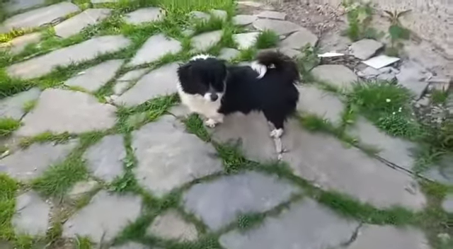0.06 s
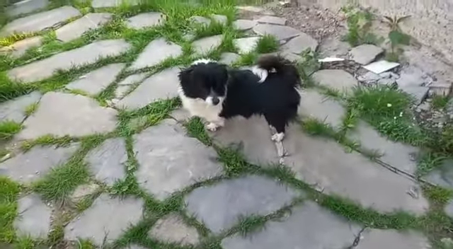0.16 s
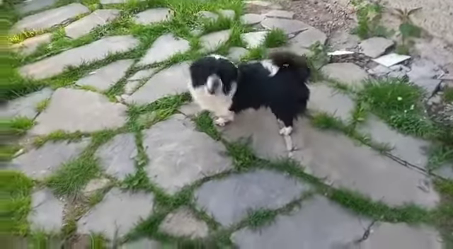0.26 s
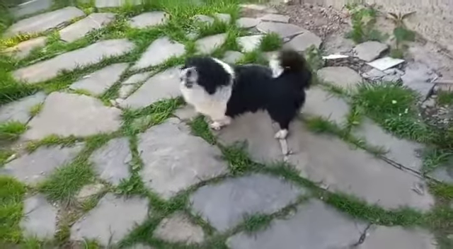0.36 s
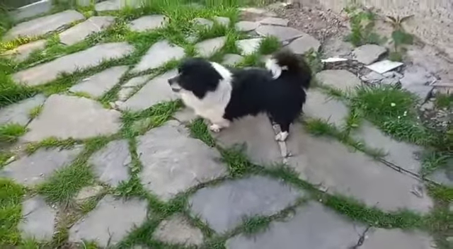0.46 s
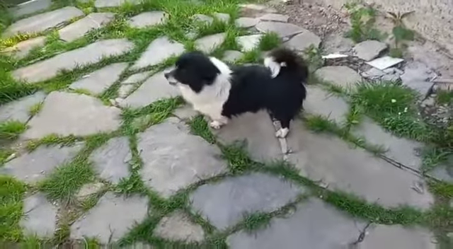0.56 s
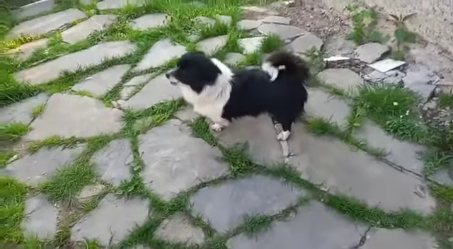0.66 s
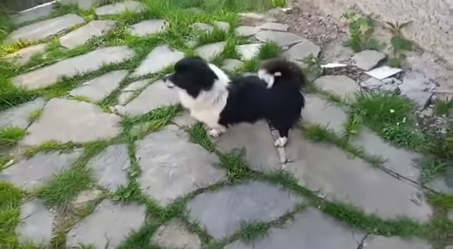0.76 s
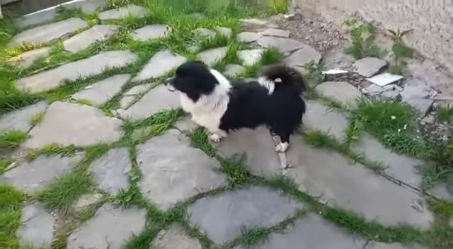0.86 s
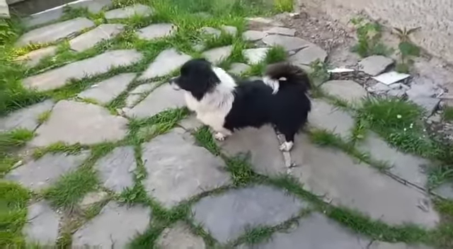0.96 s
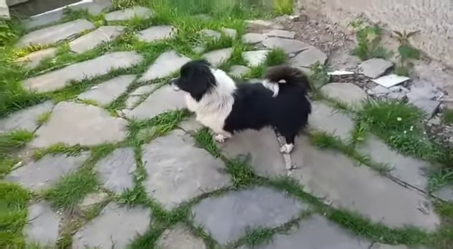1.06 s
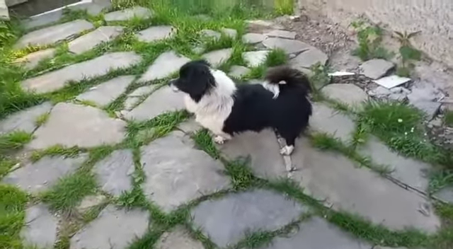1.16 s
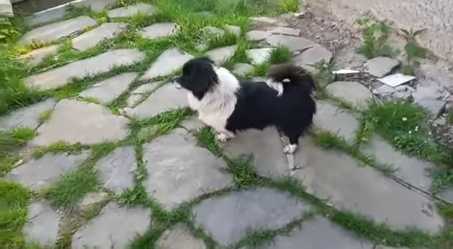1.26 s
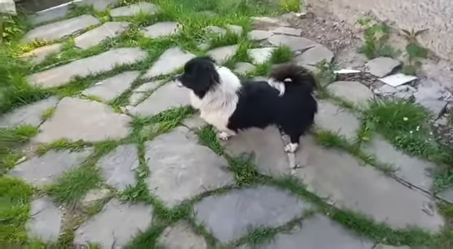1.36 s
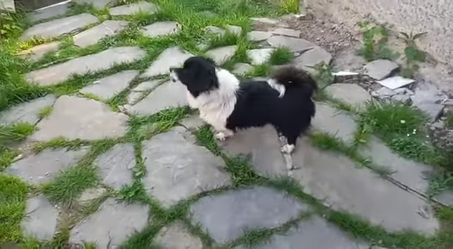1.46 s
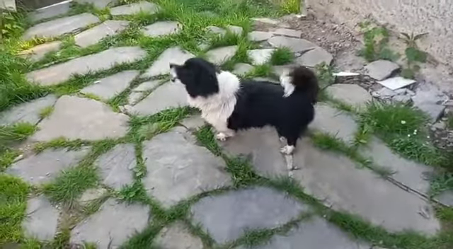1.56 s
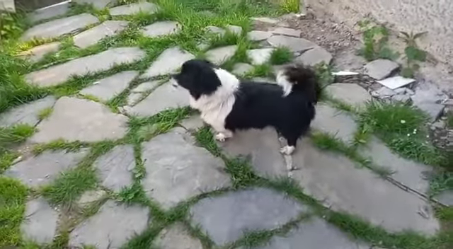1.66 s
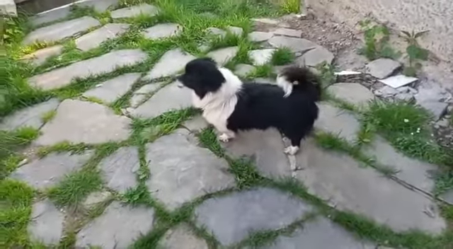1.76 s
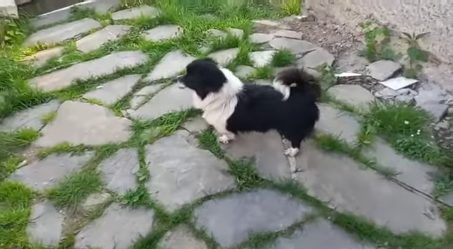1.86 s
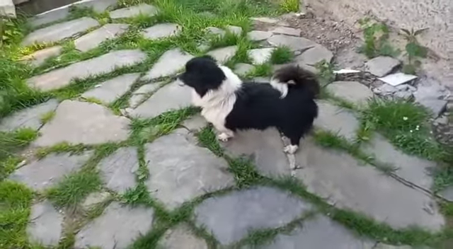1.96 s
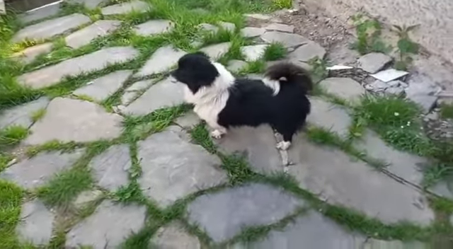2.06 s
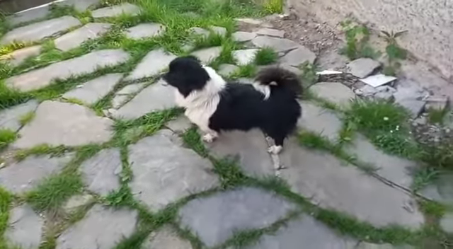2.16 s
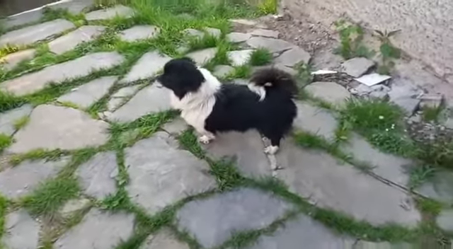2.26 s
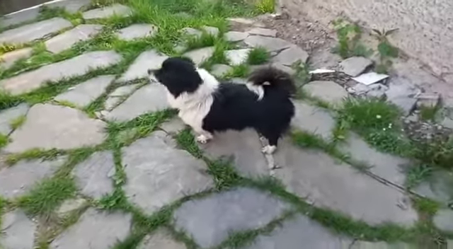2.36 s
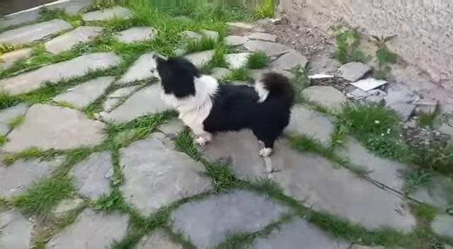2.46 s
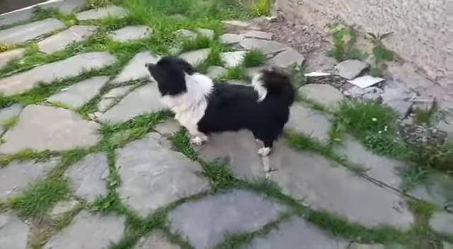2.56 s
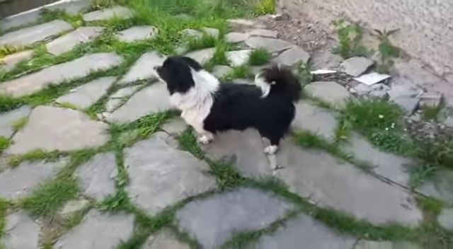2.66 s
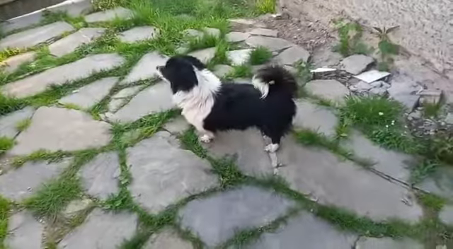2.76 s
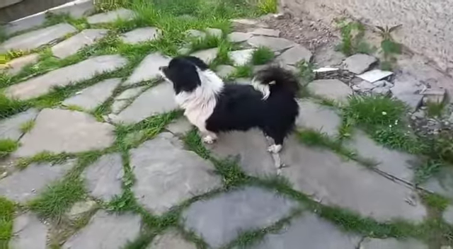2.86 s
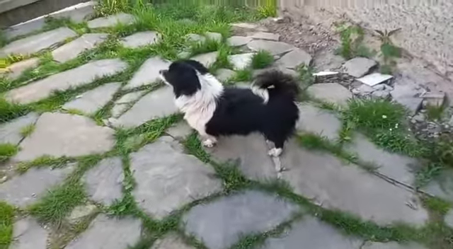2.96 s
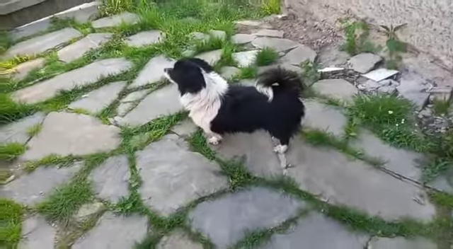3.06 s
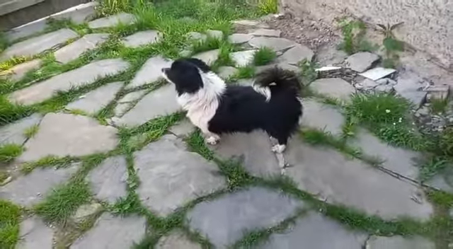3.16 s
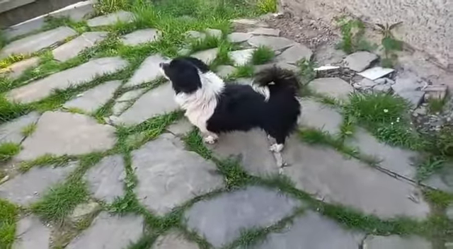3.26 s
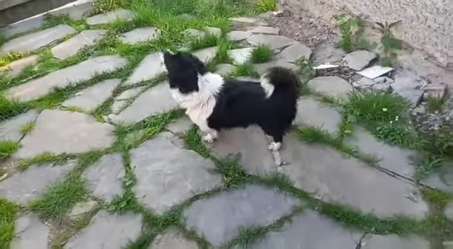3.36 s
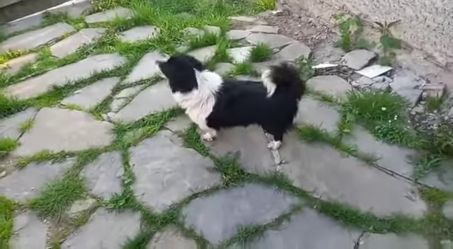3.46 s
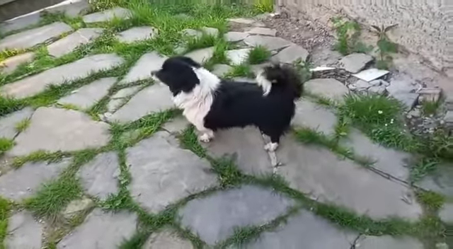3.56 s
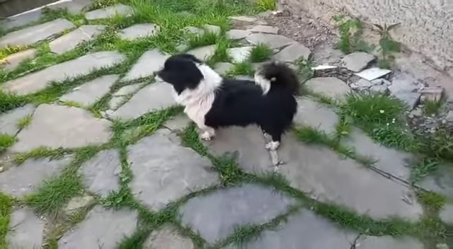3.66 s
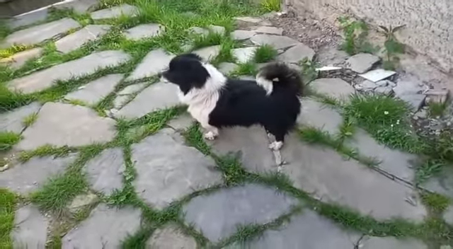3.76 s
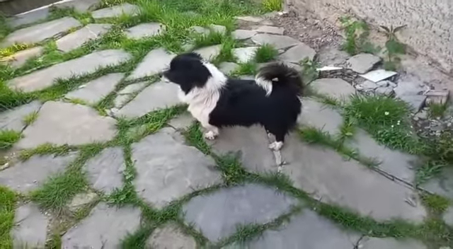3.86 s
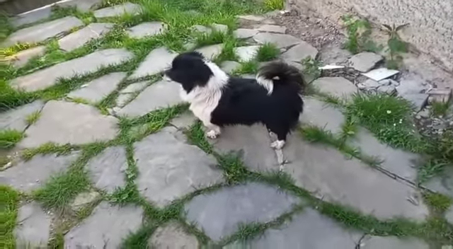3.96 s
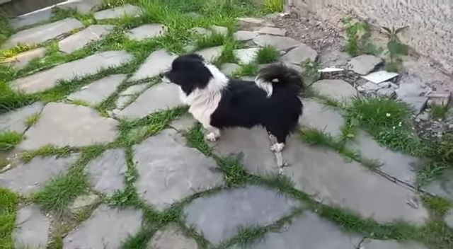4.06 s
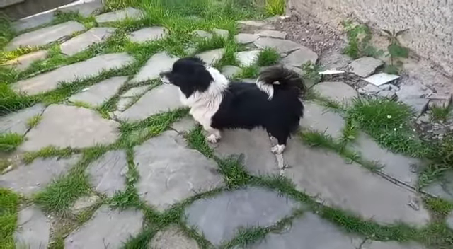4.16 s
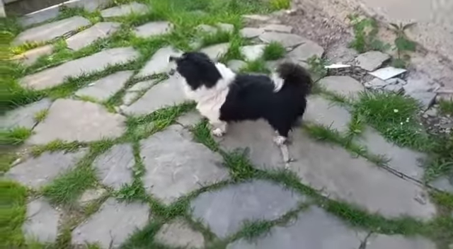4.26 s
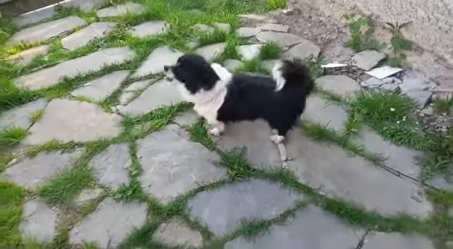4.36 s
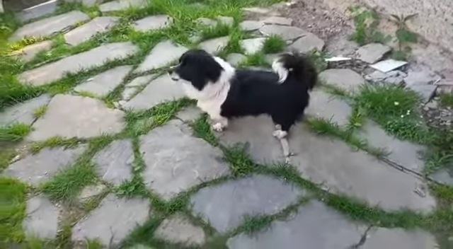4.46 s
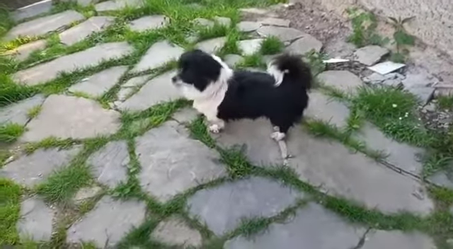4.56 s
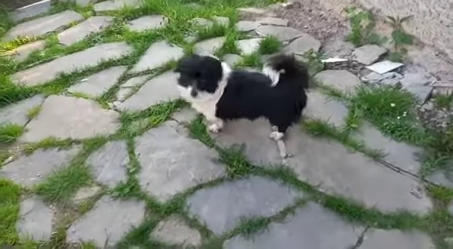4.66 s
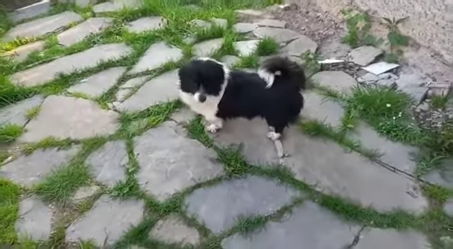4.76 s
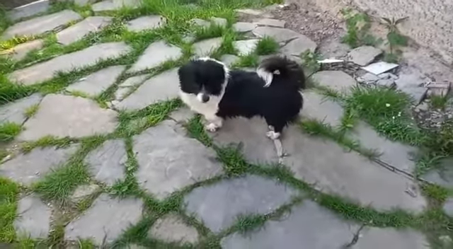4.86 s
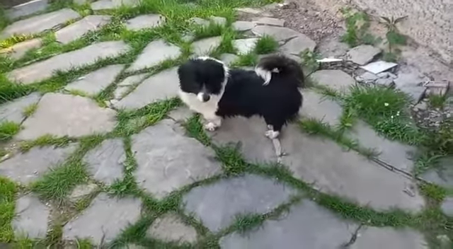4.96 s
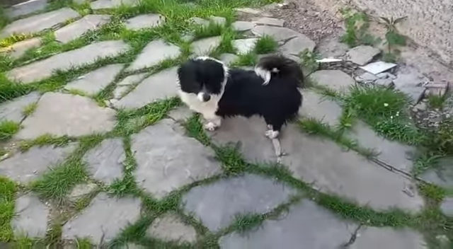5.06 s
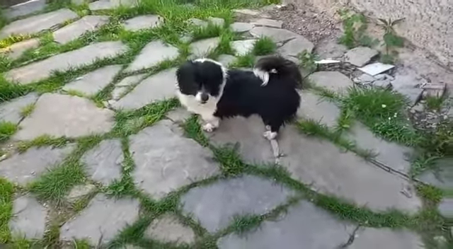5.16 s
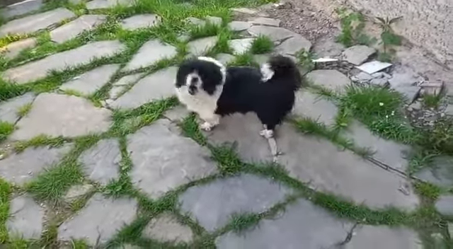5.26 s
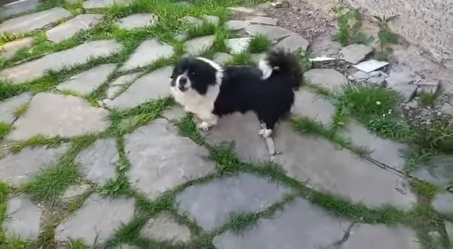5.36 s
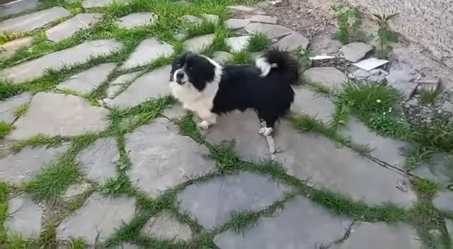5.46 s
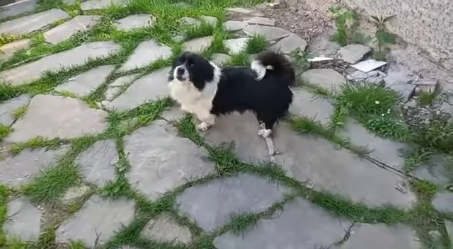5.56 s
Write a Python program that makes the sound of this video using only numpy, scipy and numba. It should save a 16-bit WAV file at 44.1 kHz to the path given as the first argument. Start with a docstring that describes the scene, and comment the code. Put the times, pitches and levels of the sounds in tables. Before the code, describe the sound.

Six short raspy barks from a small dog outdoors, about one a second, with quick wall reflections, low traffic murmur and tiny far-off bird whistles.

```python
"""Distant traffic murmurs and small birds call far off; then a small dog barks six times on garden flagstones.
It stands a few steps from a two-port microphone, and its last bark sinks into a hum.
The barks are hoarse: unsteady vocal folds and rushing air sound through a throat and mouth that open and close.
Walls nearby and the garden answer each bark; dry grass stirs and small ticks fall close by.
Traffic is shaped noise, birds are gliding sines, grass and ticks are short noise bursts."""
import sys
import numpy as np
from scipy import signal
from scipy.fft import rfft, irfft, next_fast_len
from scipy.io import wavfile
from scipy.ndimage import uniform_filter1d, minimum_filter1d, map_coordinates
from numba import njit

SR = 44100
rng = np.random.default_rng(int(sys.argv[2]) if len(sys.argv) > 2 else 0)


def pcm_store(signal):
    """Save signal as 16-bit PCM."""
    levels = np.round(np.clip(np.atleast_2d(signal), -1, 1) * 32767)
    wavfile.write(sys.argv[1], SR, levels.astype(np.int16).T)


N = 248283

# Distant traffic, spectrum shape before levelling: freq_hz, density_db
MURMUR_SPECTRUM = [(15, -57.5), (25, -28), (59, 1.5), (169, -13), (247, -11.5), (360, -7.5), (459, -4),
                   (554, -5.5), (1000, -9), (1150, -18), (2500, -22), (3650, -38), (3960, -43.5),
                   (5470, -51.5), (15600, -55.5)]
# How alike the murmur is in the two ports: freq_hz, likeness (0-1)
PORT_LIKENESS = [(40, 0.92), (130, 1), (290, 0.92), (640, 0.45), (1400, 0)]
# Which side the murmur leans to: freq_hz, left_minus_right_db
MURMUR_LEANING = [(60, -1), (180, -2.5), (550, 0), (1650, -8), (4970, -14.5), (15000, -2.5)]
# Level of the low rumble before its random swell, points joined by straight lines: time_s, level_db
RUMBLE_LEVEL = [(0.0, -68.5), (1.46, -72), (1.58, -60.5), (2.34, -78), (2.49, -65.5), (3.98, -73.5),
                (4.86, -62.5), (4.99, -75), (5.54, -56.5), (5.63, -71.5)]
# Far birds, level before flutter and mix: start_s, length_s, start_hz, end_hz, level_db
BIRD_CALLS = [(0.044, 0.034, 3770, 4140, -81), (0.785, 0.096, 3690, 3860, -85),
              (1.949, .05, 2016, 1927, -68.5), (1.977, 0.097, 2900, 2880, -76),
              (2.353, 0.082, 2440, 2408, -71.5), (2.794, 0.07, 4050, 3980, -76.5),
              (2.889, 0.069, 3110, 2940, -66.5), (3.676, .047, 2870, 3010, -67),
              (3.735, 0.065, 2874, 2830, -70), (3.898, 0.066, 2900, 2820, -67),
              (3.997, .065, 3405, 2927, -64.5), (4.063, .055, 3090, 3040, -66),
              (4.05, 0.092, 2250, 2220, -73.5), (4.135, .034, 2840, 2660, -71.5),
              (4.549, 0.05, 2845, 3180, -63.5), (4.721, 0.11, 3355, 2817, -65.5),
              (4.82, 0.064, 7310, 7540, -88), (5.02, .05, 2275, 2144, -76)]
# Each bark's place and mouth; the last four are added to the shared course: start_s, length_s,
# left_minus_right_db (mouth open), low_hz, middle_hz, middle_db, throat_db, hiss_db, octave_db
BARKS = [(0.293, .225, 0.85, 650, 1021, 5.5, 0, 2.5, -1), (1.483, .245, 0.033, 723.7, 910, 0, -0.58, 0, -2),
         (2.438, .2, 1, 710, 930, 0, -0.89, -2, 1.5), (3.323, .22, 1.5, 718.3, 940, 1, 0, -1.5, 2),
         (4.221, .225, 0.5, 693.6, 960, -0.5, 0.096, 0, -1.07),
         (5.215, 0.22, 0.52, 690, 970, -4, 0.94, 1, -2)]
# Each bark's effort, an arch, the last ending in a hum: time_s, pitch_hz, rasp_db, tone_db, mouth_opening (0-1)
BARK_EFFORT = [
    [(.293, 415, -45, -58, 0.1), (.311, 480, -31, -35.5, .6), (.34, 560.5, -21.5, -21, .8),
     (.396, 602, -23.5, -23, 0.92), (.42, 570.3, -23.5, -32.5, .85), (.458, 371.6, -30.5, -30, .51),
     (.49, 240.1, -40, -43.5, .35), (.52, 207.4, -45.5, -50.5, .51)],
    [(1.487, 265.9, -58, -67.5, 0.03), (1.518, 439.1, -27, -27.5, .55), (1.57, 604.2, -19, -23, 1),
     (1.62, 647.4, -22, -28, .85), (1.648, 531.4, -21, -28, .55), (1.67, 434.9, -28.5, -29.5, .45),
     (1.704, 228.5, -40, -52.5, .35), (1.73, 205.1, -45.5, -51, 0.6)],
    [(2.44, 355.1, -39, -73, .2), (2.466, 457.2, -25, -25.5, 0.8), (2.492, 532.9, -22.5, -21.5, 1),
     (2.525, 523.3, -21, -25, .95), (2.577, 494.5, -21.5, -33, 0.5), (2.61, 339.3, -24, -39.5, .35),
     (2.64, 230.1, -43.5, -50, .35), (2.68, 200, -48.5, -67, 0.8), (2.8, 185, -63.5, -75, 0.88)],
    [(3.32, 340.8, -45, -44.5, .01), (3.346, 466.7, -23.5, -27, 0.6), (3.39, 555, -22, -29, .95),
     (3.44, 557, -21.5, -32, 0.94), (3.474, 479.4, -21.5, -31, .55), (3.495, 419.5, -25.5, -36.5, .45),
     (3.52, 265.3, -34.5, -48.5, .45), (3.54, 230.1, -41.5, -48.5, .6)],
    [(4.226, 309.8, -60, -56, .1), (4.245, 409, -29, -32, 0.5), (4.262, 474.3, -23, -24, 0.8),
     (4.308, 606.7, -20, -22, .9), (4.342, 655.2, -21, -29, .9), (4.395, 446.4, -24.5, -30.5, .45),
     (4.432, 211.2, -42.5, -59, .35), (4.45, 204.1, -53, -55, .3)],
    [(5.215, 344.9, -60.5, -41, 0.3), (5.233, 479.9, -21, -35.5, .45), (5.25, 563.2, -17.5, -31, 1),
     (5.29, 591.1, -16, -16.5, .95), (5.325, 554.4, -22, -28, .95), (5.35, 475.3, -25.5, -30.5, .95),
     (5.39, 351.1, -26.5, -31.5, 0), (5.424, 196.4, -41.5, -35.5, .3), (5.45, 174.6, -57, -50, 0.3),
     (5.5, 157.9, -60, -44.5, .4), (5.55, 168.4, -66, -39, 0.28), (5.63, 182, -73, -40, .4)],
]
# The course all barks share: share of the length, low and middle resonance (times the bark's own),
# high_hz, then middle_db, throat_db, hiss_db, octave_db (re the rasp)
BARK_COURSE = [(0, 1.2, 1.1, 1340, -13.5, -33, -45, -21.5), (.1, .95, 1, 1361, -16, -16, -27.5, -18),
               (.25, 0.94, 0.96, 1225, -8, -2, -18.5, -9), (.5, 1.07, 0.9, 1160, 2.5, 1.5, -17, -8),
               (.68, 1.04, .98, 1170, -2, -4, -20.5, -3.5), (.85, 1.13, 1.2, 1180, -5.5, -7, -19, -11.5),
               (1, 1.07, 0.98, 1160, -5, -7, -23.5, -16.5)]
# Throat resonances, levels re one another: freq_hz, width_hz, level_db
THROAT_RESONANCES = [(1409, 36, -5), (1600, 590, 2), (2075, 250, 1), (2309, 200, 0.5), (2610, 740, -8.5),
                     (3400, 490, -11)]
# Rushing air, spectrum shape before levelling: freq_hz, level_db
HISS_SPECTRUM = [(2240, -41), (3800, -11), (4350, -18), (4900, -5), (5320, -5.5), (6550, -3), (7070, -6.5),
                 (10800, -8.5), (11400, -10.5), (14100, -21), (15600, -21.5)]
# The dog at the two ports: freq_hz, left_minus_right_db
PORT_BALANCE = [(60, -1), (92, 0), (140, 1.5), (210, -1.5), (330, -1.5), (500, -3.5), (770, -0.5),
                (1170, 6.5), (1790, -2.5), (2740, -11), (4190, -0.5), (6410, 9.5), (9810, -1),
                (15000, -14.5)]
# Decay of the answer from the walls: freq_hz, t60_s
WALL_DECAY = [(200, 0.91), (800, 0.12), (2300, 0.13), (5000, 0.17), (12000, 0.054)]
# Colour of the walls' answer to the dog: freq_hz, level_db (re the dry voice)
WALL_COLOUR = [(100, -29.5), (300, -16.5), (800, -8.5), (2500, -3), (6000, -3), (9000, 1.5), (14000, 4.5)]
# Decay of the later answer from the garden: freq_hz, t60_s
GARDEN_DECAY = [(200, 0.17), (800, 0.33), (2300, 0.41), (4000, 0.5), (6000, 0.25), (12000, 0.51)]
# Dry grass stirring, level before trim and filter: start_s, level_db
GRASS_RUSTLES = [(.542, -47), (.566, -55), (.588, -52), (1.2133, -66), (1.236, -64), (1.4104, -69)]
# Small ticks nearby, level before the filter and port balance: start_s, level_db
NEAR_TICKS = [(0.8166, -52), (2.0694, -62.5), (3.2446, -55.5)]

TOP_HZ = 15790  # band limit of the microphone
SHUT_DB, OPEN_DB = -25.5, 2  # the high mouth resonance, mouth shut and wide open
TREBLE_SHUT_DB = -4  # change of throat and hiss behind shut lips
CHEST_DB, CHEST_UNDER_DB = -39.5, 1.5  # the chest booms evenly, at least this far under the rasp
HUM_HZ, HUM_OCTAVE_DB = 230, -4  # below this pitch the octave stays close to the tone
REST_PAN_DB = -1.35  # left minus right, mouth shut


def amp(db):
    """dB to gain."""
    return 10 ** (np.asarray(db) / 20)


def unit(x):
    """Scaled to rms 1."""
    return x / np.sqrt(np.mean(x ** 2) + 1e-20)


def along(points, hz):
    """(freq_hz, value) points read on a log frequency axis."""
    f, v = np.transpose(points)
    return np.interp(np.log(hz + 1), np.log(f + 1), v)


def curves(rows):
    """One value per sample for each column after the time."""
    s, *cols = np.transpose(rows)
    return [np.interp(np.arange(N) / SR, s, c) for c in cols]


def wobble(rate):
    """A smooth random curve, rate knots a second."""
    knots = rng.standard_normal(int(N * rate / SR) + 4)
    return map_coordinates(knots, [np.arange(N) * rate / SR])


def filtered(x, response):
    """x times a complex response of frequency."""
    m = next_fast_len(N + SR // 2)
    return irfft(rfft(x, m) * response(np.fft.rfftfreq(m, 1 / SR)), m)[..., :N]


def patchy(x, depth_db):
    """x with random patches of gain, some hundred Hz by some ten ms."""
    z = signal.stft(x, nperseg=512)[2]
    field = rng.standard_normal(z.shape[-2:])
    field = uniform_filter1d(uniform_filter1d(field, size=5, axis=0), size=10, axis=1)
    return signal.istft(z * amp(depth_db * unit(field)), nperseg=512)[1][..., :N]


@njit
def ring(x, turn, pole):
    """A two-pole band resonance whose angle per sample may move."""
    y = np.zeros(len(x))
    for i in range(2, len(x)):
        y[i] = x[i] - x[i - 2] + 2 * pole * np.cos(turn[i]) * y[i - 1] - pole * pole * y[i - 2]
    return y


def resonance(x, hz, width_hz):
    """x through a moving resonance applied twice for dark valleys, rms 1."""
    turn = 2 * np.pi * hz / SR * np.ones(N)
    pole = np.exp(-np.pi * width_hz / SR)
    return unit(ring(ring(x, turn, pole), turn, pole))


def sounding(spans, rise, fall):
    """1 inside the (start, end) spans, 0 outside, with soft edges of rise and fall seconds."""
    t = np.arange(N) / SR
    return sum(np.clip(np.minimum((t - a) / rise, (b - t) / fall), 0, 1) ** 2 for a, b in spans)


def traffic():
    """Far traffic as patchy stereo noise: a murmur and a lumpy rumble, the ports most alike in the bass."""
    rumble_db, = curves(RUMBLE_LEVEL)
    pair = patchy(rng.standard_normal((2, N)), depth_db=1.3)

    def mid_side(hz):
        angle = np.arccos(np.clip(along(PORT_LIKENESS, hz), -1, 1)) / 2
        return amp(along(MURMUR_SPECTRUM, hz)) * [np.cos(angle), np.sin(angle)]

    mid, side = filtered(pair, mid_side)
    ports_pair = np.array([mid + side, mid - side])
    wide = filtered(ports_pair, lambda hz: amp(np.outer([.5, -.5], along(MURMUR_LEANING, hz))))
    rumble = filtered(wide, lambda hz: hz < 130)
    murmur_db = -61.0 + .6 * wobble(4)
    rumble_db = rumble_db + 2.1 * wobble(7.6)
    return amp(murmur_db) * unit(wide - rumble) + amp(rumble_db) * unit(rumble)


def birds():
    """Short gliding whistles with wavering pitch and a level that flutters, as from far away."""
    out = np.zeros(N + SR)
    for s, length, start_hz, end_hz, db in BIRD_CALLS:
        n = int(length * SR)
        warble = 1 + 0.021 * wobble(200)[:n]
        phase = 2 * np.pi * np.cumsum(np.linspace(start_hz, end_hz, n) * warble) / SR
        out[round(s * SR):][:n] += amp(db) * np.hanning(n) * np.sin(phase)
    return out[:N] * amp(4.0 * wobble(140))


def course():
    """The shared course stretched over each bark, with that bark's own resonances and colour."""
    rows = []
    for s, length, pan_db, low_hz, middle_hz, *own_db in BARKS:
        for share, low, middle, high_hz, *shared_db in BARK_COURSE:
            levels_db = np.add(shared_db, own_db)
            rows.append((s + share * length, low * low_hz, middle * middle_hz, high_hz, *levels_db, pan_db))
    return curves(rows)


def folds(pitch, mouth_db, first_db, octave_db):
    """Unsteady vocal folds: a wavering tone with overtones, strong and weak cycles alternating under effort."""
    unsteady = .015 + .035 * np.clip((mouth_db + 50) / 20, 0, 1)
    turn = 2 * np.pi * np.cumsum(pitch * (1 + unsteady * wobble(110))) / SR
    overtones = np.sin(2 * turn) + amp(-9.5) * np.sin(3 * turn)
    overtones = overtones + amp(-17.0) * np.sin(4 * turn) + amp(-18) * np.sin(5 * turn)
    octave = amp(octave_db + 3.7 * wobble(70)) * overtones
    voice = np.sqrt(2) * (amp(first_db + 2.5 * wobble(70)) * np.sin(turn) + octave)
    alternation = amp(mouth_db + 9 + 3.8 * wobble(40)) * np.cos(turn / 2)
    return voice * (1 + alternation)


def breath(pitch, jitter=.1, air=.72):
    """Uneven puffs through the folds mixed with air noise that swells once a cycle; also the air alone."""
    cycles = np.cumsum(pitch * (1 + jitter * wobble(220))) / SR
    opening = (.5 + .5 * np.cos(2 * np.pi * cycles)) ** 6
    puffs = unit(opening - uniform_filter1d(opening, size=200)) * amp(4.8 * wobble(250))
    breathy = unit((.5 + opening) * rng.standard_normal(N))
    return (1 - air) * unit(puffs) + air * breathy, breathy


def dog():
    """A fold tone plus puffs and air noise ringing in mouth, throat and chest; a shut mouth dulls the treble."""
    low, middle, high, middle_db, throat_db, hiss_db, octave_db, _ = course()
    pitch, mouth_db, first_db, gape = curves(np.vstack(BARK_EFFORT))
    high_db = SHUT_DB + (OPEN_DB - SHUT_DB) * gape
    muffle_db = TREBLE_SHUT_DB * (1 - gape)
    throat_db, hiss_db = throat_db + muffle_db, hiss_db + muffle_db
    chest_db = np.minimum(CHEST_DB - mouth_db, -CHEST_UNDER_DB)
    octave_db = np.where(pitch < HUM_HZ, first_db + HUM_OCTAVE_DB, mouth_db + octave_db)
    octave_db = uniform_filter1d(octave_db, size=441)  # 10 ms

    source, breathy = breath(pitch)
    mouth = resonance(source, low, 150) - amp(middle_db) * resonance(source, middle, 150)
    palate = resonance(source, high, 220)
    throat = np.zeros(N)
    for k, (hz, width_hz, db) in enumerate(THROAT_RESONANCES):
        throat += (-1) ** k * amp(db + 3.0 * wobble(25)) * resonance(source, hz, width_hz)
    throat = unit(throat)
    hiss = unit(filtered(patchy(breathy, depth_db=3.0), lambda hz: amp(along(HISS_SPECTRUM, hz))))
    chest = resonance(source, 210, 95)
    tract = mouth + amp(high_db) * palate + amp(throat_db) * throat
    tract = tract + amp(hiss_db) * hiss + amp(chest_db) * chest

    barking = sounding([(v[0][0] - .006, v[-1][0]) for v in BARK_EFFORT], rise=.03, fall=.04)
    voiced = sounding([(v[0][0], v[-1][0] + .02) for v in BARK_EFFORT], rise=.015, fall=.02)
    voice = folds(pitch, mouth_db, first_db, octave_db)

    def dip(f):  # the tone fades between chest and mouth, around 310 Hz
        return (310 ** 2 - f * f + 25j * f) / (310 ** 2 - f * f + 140j * f)

    return filtered(voice * voiced, dip) + amp(mouth_db) * tract * barking


def ports(x, lag=.00048, corner_hz=1120):
    """The left port hears the dog first; long waves bend round the housing and lag less."""
    def response(hz):
        lead = np.pi * hz * lag * (0.18 + .85 / (1 + (corner_hz / (hz + 1)) ** 6))
        side = np.array([[1], [-1]])
        return amp(side * along(PORT_BALANCE, hz) / 2) * np.exp(1j * side * lead)
    return filtered(np.array([x, x]), response)


def facing():
    """Left minus right dB: the muzzle swings as the mouth opens."""
    gape = np.clip(curves(np.vstack(BARK_EFFORT))[-1], 0, 1)
    return REST_PAN_DB + (course()[-1] - REST_PAN_DB) * gape ** 2


def echoes(x, decays, wait):
    """A diffuse answer after wait seconds, each frequency dying at its own speed; a new one for each bark."""
    out = np.zeros((2, N + 2 * SR))
    edges = [0] + [round((b[0] - .05) * SR) for b in BARKS[1:]] + [N]
    for a, b in zip(edges, edges[1:]):
        hz, t, z = signal.stft(rng.standard_normal((2, SR)), SR, nperseg=256)
        decay = amp(-60 * t / along(decays, hz)[:, None])
        tail = signal.istft(z * decay, SR, nperseg=256)[1]
        wet = signal.fftconvolve(x[None, a:b], tail / np.linalg.norm(tail[0]), axes=1)
        out[:, a + int(wait * SR):][:, :wet.shape[1]] += wet
    return out[:, :N]


def rustles():
    """Dry grass: short crisp crackles of high-passed noise, different in each port."""
    out, t = np.zeros((2, N + SR)), np.arange(SR // 5) / SR
    for s, db in GRASS_RUSTLES:
        envelope = amp(db - 6.5 - 60 * t / .07) * (1 - np.exp(-t / .002))
        out[:, round(s * SR):][:, :len(t)] += envelope * rng.standard_normal((2, len(t)))
    crackle = out[:, :N] * amp(1.5 * wobble(340))
    return filtered(crackle, lambda hz: (1j * hz / 3500 / (1 + 1j * hz / 3500)) ** 2)


def ticks():
    """Dry clicks of a few milliseconds: dying noise, softened in the treble."""
    out, t = np.zeros(N + SR), np.arange(SR // 20) / SR
    for s, db in NEAR_TICKS:
        out[round(s * SR):][:len(t)] += amp(db - 60 * t / 0.018) * rng.standard_normal(len(t))
    return filtered(out[:N], lambda hz: 1.2 / (1 + 1j * hz / 2500) ** 2)


def scene():
    """Traffic and birds far off, the dog a few steps away with its echoes, grass and ticks close by."""
    voice, calls = dog(), birds()
    facing_db = facing()
    direct = ports(voice) * amp([facing_db / 2, -facing_db / 2])
    walls = filtered(echoes(voice, WALL_DECAY, wait=.004), lambda hz: amp(along(WALL_COLOUR, hz)))
    garden = amp(-23.5) * echoes(voice, GARDEN_DECAY, wait=0.039)
    near_ticks = ticks() * amp([[-3], [2]])  # left, right
    far_birds = amp(1.0) * calls + amp(3) * echoes(calls, WALL_DECAY, wait=.004)
    far_birds = far_birds + amp(-5) * echoes(calls, GARDEN_DECAY, wait=.03)
    return traffic() + far_birds + direct + walls + garden + rustles() + near_ticks


def record(dry):
    """A limiter eases the loudest peaks under full scale; nothing is kept above the band limit."""
    needed = np.minimum(1, .97 / (np.abs(dry).max(axis=0) + 1e-9))
    gain = uniform_filter1d(minimum_filter1d(needed, size=441), size=221)  # 10 ms hold, 5 ms smoothing
    return filtered(dry * gain, lambda hz: hz < TOP_HZ)


dry = scene()
out = record(dry)
pcm_store(out)
```